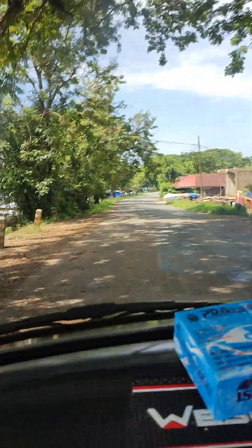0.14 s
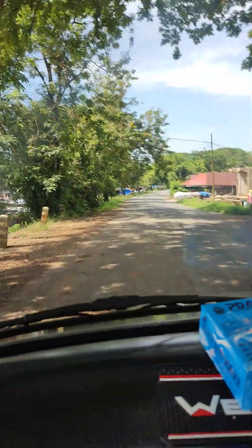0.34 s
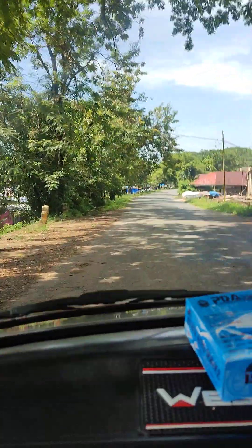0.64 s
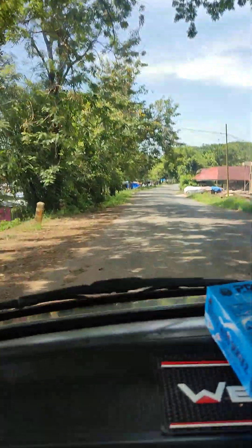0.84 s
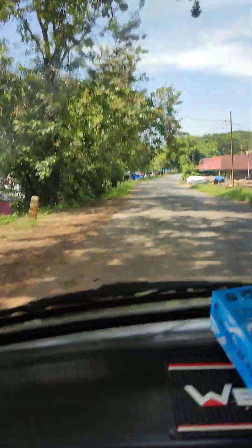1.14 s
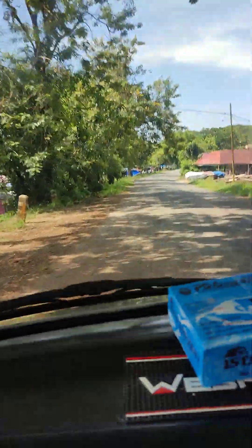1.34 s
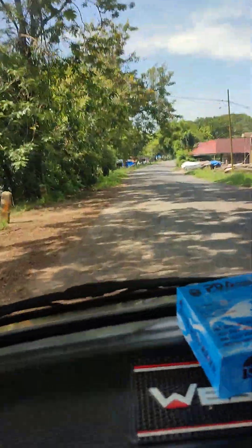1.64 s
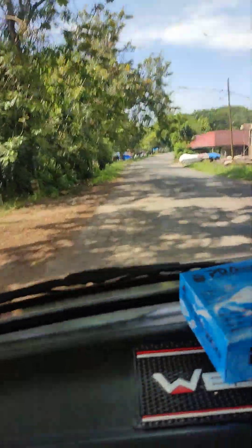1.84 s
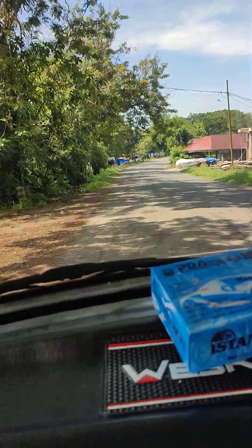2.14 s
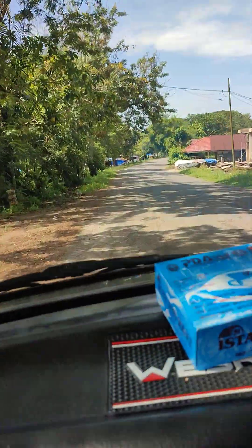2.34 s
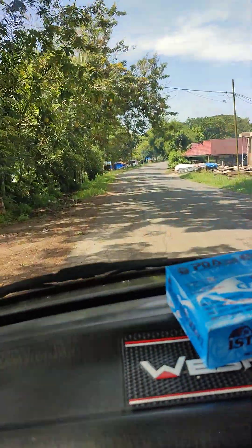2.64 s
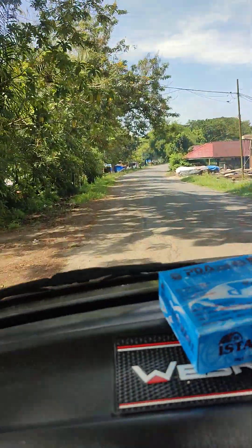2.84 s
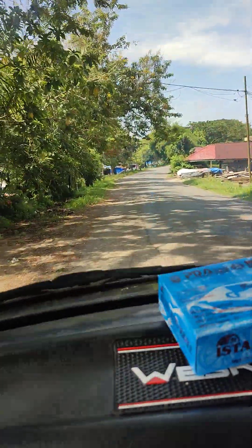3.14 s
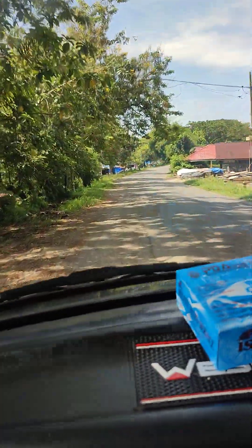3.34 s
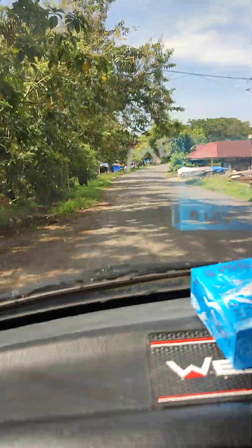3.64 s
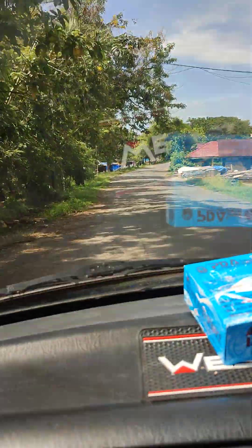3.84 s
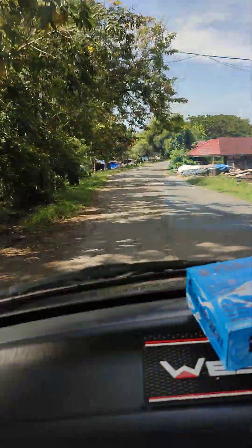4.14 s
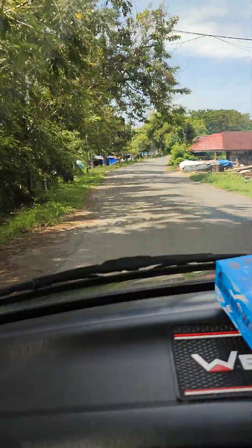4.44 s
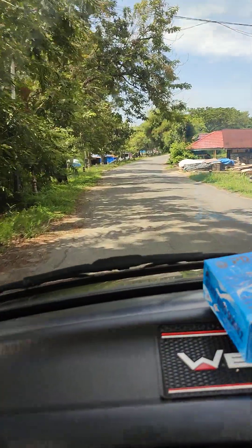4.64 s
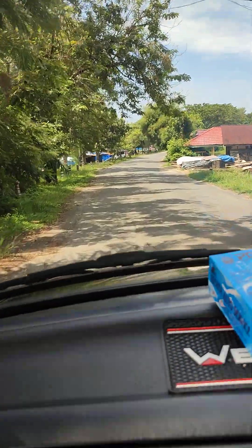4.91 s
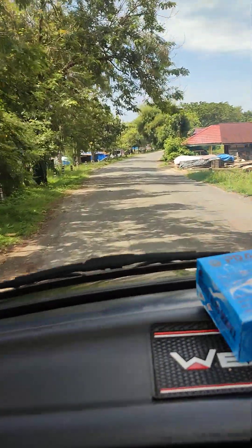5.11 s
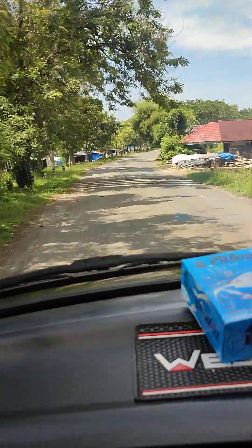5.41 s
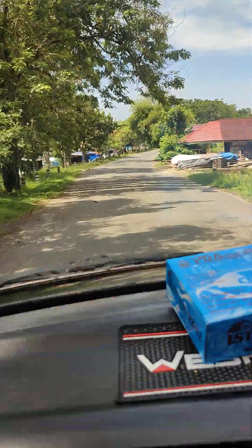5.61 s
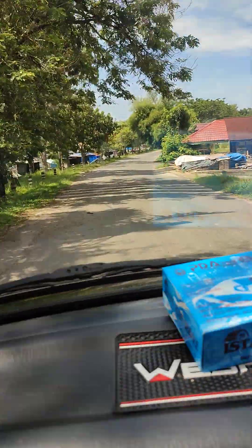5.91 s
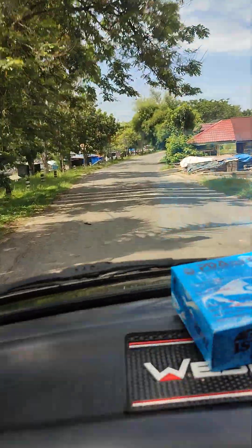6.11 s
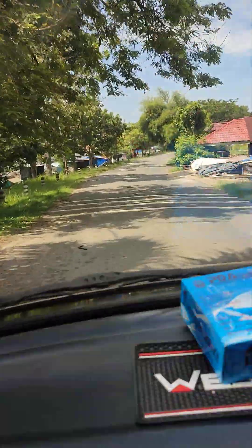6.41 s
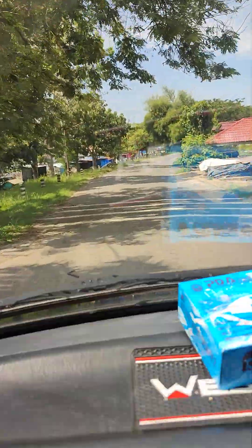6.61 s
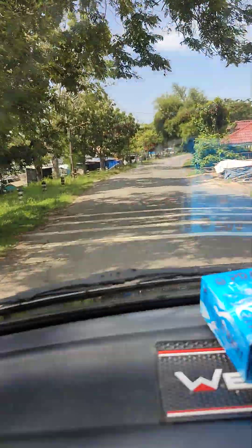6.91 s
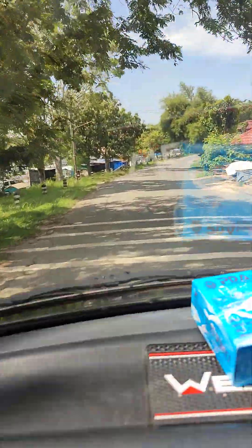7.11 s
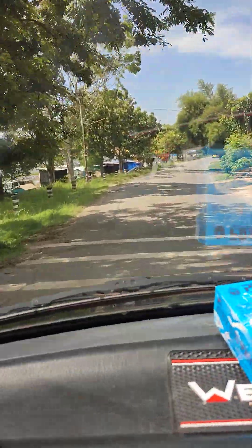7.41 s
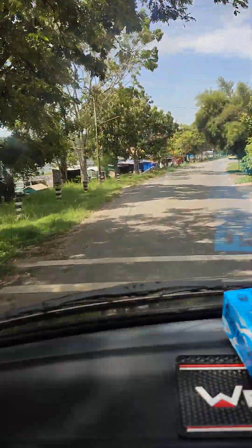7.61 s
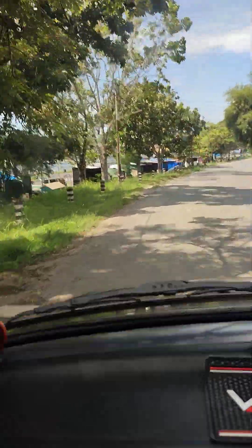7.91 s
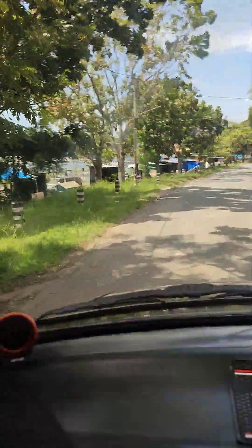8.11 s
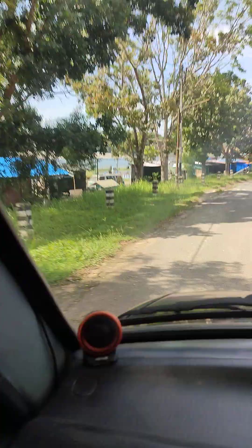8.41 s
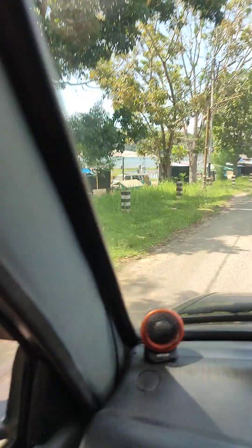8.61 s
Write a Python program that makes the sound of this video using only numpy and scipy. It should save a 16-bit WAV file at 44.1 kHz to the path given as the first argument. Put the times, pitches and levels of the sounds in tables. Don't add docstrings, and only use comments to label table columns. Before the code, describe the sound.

A car creeps along a rough road, then accelerates and holds speed, recorded in the muffled cabin. Deep body shake and engine drone dominate; soft airy hiss of grit lies above. One clear knock and a thump with clatter come early. Tiny high squeaks repeat with each wheel turn, closer together as speed rises. Two heavy low thuds and loose rattling close it.

```python
import sys
import numpy as np
from scipy import signal
from scipy.fft import rfft, irfft, next_fast_len
from scipy.io import wavfile
from scipy.ndimage import uniform_filter1d

SR = 44100
rng = np.random.default_rng(int(sys.argv[2]) if len(sys.argv) > 2 else 0)


def ratio_of_db(decibels):
    return 10 ** (np.asarray(decibels, float) / 20)


def generate_wav(signal):
    frames = np.transpose(np.atleast_2d(signal))
    scaled = np.clip(frames, -1, 1) * 32767
    pcm = np.round(scaled).astype(np.int16)
    wavfile.write(sys.argv[1], SR, pcm)


N = 385862

# [t/s, f/Hz]
FIRING = [(0, 26.3), (1.3, 26.8), (2.2, 27.4), (2.4, 28.7), (2.7, 31.6), (3, 33.7), (3.5, 37.1), (3.85, 40),
          (4.2, 42.5), (4.55, 45), (4.9, 47.7), (5.25, 49.2), (5.6, 50), (6, 50.8), (6.7, 51.3),
          (7.7, 51.3), (8.75, 50.8)]
# [t/s, lumps level/dB, loose grit level/dB]
SURFACE = [(0, -1.5, -1.5), (.5, -2, 2), (.85, 0.5, -0.5), (.95, 0, 3.5), (1.4, -0.5, 3), (1.68, 5.5, 3.5),
           (1.85, -1, 1.5), (2.1, 2, -3.5), (2.7, 1.5, -3.5), (3.3, 3, -3), (4.1, 3, -2), (5.2, 0.5, 0),
           (6.1, 0.5, -1.1), (6.7, -1.5, 0.5), (7.7, -1, 0.5), (7.95, -1, 0.5), (8.44, 4.5, 2.5),
           (8.75, 8.5, -0.5)]
# [t/s, level/dB]
RIDE = [(0, -1), (.45, -2.5), (.95, 2.5), (1.24, -6), (1.45, 5.5), (1.73, 10.5), (1.88, -12), (2.26, 4.5),
        (2.6, -5.5), (3.4, 4), (4.5, -2), (4.8, 2.5), (5.36, -2.5), (5.63, 1.5), (6.25, -2.5), (6.4, 5),
        (7.53, -4), (8.55, 11.5)]
# [t/s, extra hiss level/dB, length/s]
JOLTS = [
    (0.622, 4, 0.055),
    (1.58, 3, .04),
    (1.674, 3, 0.022),
    (5.485, 1, .02),
    (8.458, 2, 0.064),
    (8.65, 5.5, 0.052),
]

# [t/s, firing order level/dB, second order level/dB]
ENGINE = [(0, -38.5, -33.5), (.9, -36.5, -34.5), (1.5, -39, -31), (2, -27.5, -59), (2.5, -44, -45),
          (2.9, -22, -34), (3.2, -31, -31.5), (3.6, -19.5, -28), (4.05, -26.5, -29.5), (4.17, -21.5, -44),
          (4.3, -24, -28), (4.53, -21.5, -27), (4.63, -29, -39), (4.8, -28, -36), (5.2, -26, -40),
          (5.43, -36, -57), (5.7, -19.5, -56), (6.3, -25, -62), (6.7, -24, -64), (7.75, -26.5, -71),
          (7.91, -20.5, -50), (8.04, -25, -57), (8.2, -17.5, -59), (8.36, -22, -50), (8.45, -28, -49),
          (8.55, -20.5, -47), (8.75, -30, -46)]
# [multiple, level/dB]
UPPER_ORDERS = [(3, 0), (4, -1), (5, -3), (6, -4)]
# [t/s, level/dB]
THROTTLE = [(0, -58), (2.4, -55), (2.7, -43), (3.5, -48), (4.1, -43), (4.6, -52), (5.2, -54), (6.6, -53),
            (8.75, -57)]
# [f/Hz, level/dB]
CABIN = [(70, -6), (105, 4), (128, 7), (160, -5), (205, 2), (235, -7), (320, -12)]

# [f/Hz, level per Hz/dB]
HEAVE = [(3, -29), (7, -19), (11, -14), (15, 7.5), (20, -7.5), (24, -0.5), (32, -25)]
SHAKE = [(18, -15), (25, 4.5), (33, -4), (41, -7), (50, 3.5), (62, -28.5)]
BOOM = [(40, -36), (54, 8), (64, 0), (76, -5.5), (95, -6), (130, -41)]
# [f/Hz, level per Hz/dB]
ROAR = [(70, -35), (100, -4.5), (115, -4.5), (135, 1.5), (165, -6.5), (205, -5.5), (240, -11.5),
        (300, -11.5), (370, -19), (480, -21), (700, -28.5)]
RUSH = [(300, -7), (450, -0.5), (600, -8.5), (800, -4.5), (1100, -6.5), (1350, -9.5), (2100, -11.5),
        (2500, -27), (3300, -21)]
HISS = [(2000, -0.5), (2700, 0), (3500, -1.5), (4500, -3), (5500, -5.5), (6500, -4.5), (7400, -4.5),
        (8000, -10), (8900, -16), (9500, -20.5)]
FIZZ = [(8000, -19), (9300, -1.5), (11000, 0), (13000, 2.5), (14400, 0)]

# [f/Hz, correlation]
PORT_SAME = [(60, 1), (130, 1), (250, 0.93), (500, 0.5), (1000, 0.5), (2000, 0.27), (4000, 0.16),
             (14000, 0.15)]
# [f/Hz, level/dB]
PORT_TILT = [(30, 1), (100, .6), (600, 1), (1500, -1), (3500, -0.5), (5500, -2.5), (7000, -4.5), (7700, -4),
             (8500, 13), (9200, 8), (10000, -9), (11500, -3), (14000, 0.5)]
# [f/Hz, phase/rad]
PORT_TURN = [(20, .03), (60, 0.08), (250, 0.22), (520, 0.83), (1120, 1.75), (1720, 1.93), (2330, 4.2),
             (4650, 4.37)]

# [t/s, level/dB, overtone level/dB]
SQUEAKS = [(.2114, -52, -64), (.5985, -61, -66), (1.0031, -56, -65), (1.3867, -56, -64), (1.7574, -56, -68),
           (2.1184, -61, -70), (2.4768, -58, -63), (2.8165, -55, -70), (3.1293, -58, -66),
           (3.4224, -57, -69), (3.7024, -55, -69), (3.9654, -55, -65), (4.2104, -57, -66),
           (4.6794, -58, -66), (4.9094, -56, -66), (5.1264, -62, -75), (5.3424, -57.5, -70),
           (5.7684, -60, -70), (5.9674, -63, -72), (6.1824, -55, -68), (6.3864, -65, -72),
           (6.5984, -57, -75), (6.8034, -57, -66), (7.2144, -54, -72), (7.4234, -58, -70),
           (7.6244, -61, -78), (7.8404, -54, -69), (8.2614, -63, -69), (8.4454, -58, -69),
           (8.6423, -58, -69)]
# [t/s, level/dB, 500-1500 Hz share level/dB, rise/s, t60/s]
RATTLES = [(.605, -51, -2, .005, 0.085), (.897, -43, -3, 0.0018, .06), (1.319, -53, -30, .002, 0.065),
           (1.455, -46, 0, .003, .06), (1.61, -47, -14, .004, 0.092), (1.6435, -33.5, -6, 0.0004, 0.03),
           (1.651, -41, -8, .001, .05), (1.69, -58, -14, .004, 0.068), (8.42, -42, 7, .003, 0.055),
           (3.0, -44, 4, .003, 0.092), (3.22, -52, -19, .004, .08), (5.481, -56, -21, .004, 0.092),
           (7.993, -39, 6, .003, 0.06), (8.272, -43.5, -4, .004, .1), (8.446, -36, -3, 0.0074, 0.15),
           (8.498, -41, -3, .002, .06), (8.63, -36, 0, 0.016, 0.15)]
# [t/s, level/dB, t60/s]
KNOCK = [
    (.909, -38, .05),
    (.9225, -24.5, .07),
    (.938, -28, .12),
]
# [f/Hz, level/dB]
KNOCK_MODES = [(339, -4), (409, -6.5), (533, -9.5), (608, -12), (694, -16), (800, -12), (894, -23)]
# [f/Hz, level/dB, t60/s]
PING = [
    (8248, -53, .4),
]
# [t/s, level/dB, f/Hz, t60/s]
THUDS = [(0.312, -33, 82, 0.17), (.31, -28, 206, 0.13), (.32, -40, 420, 0.087), (.385, -17.5, 34, .15),
         (1.072, -41, 150, 0.046), (1.601, -16, 69, 0.13), (1.613, -16, 100, 0.084),
         (1.618, -35, 210, 0.17), (1.626, -22, 146, 0.091), (1.673, -32, 122.3, 1), (1.676, -27, 180, 0.43),
         (1.709, -34, 203, 0.75), (1.701, -23, 72.5, 0.3), (7.871, -28, 72, .4), (8.324, -8.5, 27.5, 0.41),
         (8.439, -25, 123.3, 0.51), (8.518, -9, 27.7, 0.23), (8.602, -26, 60.3, 0.24)]
# [t/s, peak level/dB, f/Hz, t60/s]
TICKS = [(.600, -52, 4300, .015), (.605, -50, 5600, .03), (.605, -57, 13700, .06), (.6085, -49, 4830, .03),
         (.613, -50, 4200, .03), (.615, -50, 5700, .03), (.619, -55, 13900, .1), (.660, -53, 3200, .015),
         (.898, -56, 4050, .04), (.898, -56, 5300, .03), (1.034, -52, 2700, .03), (1.126, -53, 5450, .025),
         (1.3185, -45, 2580, .03), (1.3185, -45, 5200, .025), (1.3185, -51, 4000, .02),
         (1.325, -42, 5260, .025), (1.325, -49, 6300, .02), (1.325, -50, 3000, .02),
         (1.332, -50, 5250, .03), (1.337, -52, 4300, .02), (1.341, -48, 2600, .025),
         (1.6437, -40, 2760, 0.032), (1.6455, -45, 4170, .03), (1.651, -47, 1930, .04),
         (1.651, -48, 6640, 0.032), (1.652, -49, 8500, 0.033), (1.655, -56, 11800, .04),
         (2.900, -58, 13900, .04), (2.954, -47, 2440, .05), (2.96, -54, 3200, .05), (3.52, -56, 3450, .15),
         (3.56, -58, 3270, .15), (4.865, -50, 3150, .06), (8.437, -40, 2600, 0.033), (8.45, -44, 1800, .03),
         (8.455, -44, 3200, .025), (8.46, -44, 2500, .03), (8.464, -47, 4200, .025), (8.5, -46, 1900, .02),
         (8.638, -46, 2200, .03), (8.645, -48, 3500, .03), (8.726, -47, 2600, .04)]
# [t/s, peak level/dB, f/Hz]
CHATTER = [(3.0062, -60, 2570), (3.2571, -58, 2650), (3.3838, -57, 2700), (3.6318, -50, 2590),
           (3.9924, -50, 2520), (4.0942, -58, 2580), (4.5661, -58, 2580), (4.7308, -53, 2660),
           (4.8839, -52, 2700), (4.9368, -55, 2610), (5.3339, -57, 2620), (5.3833, -57, 2630),
           (5.4826, -61, 2640), (5.8881, -61, 2630), (6.812, -57, 2600), (7.0435, -58, 2620),
           (7.2765, -56, 2620), (7.6955, -57, 2530)]

# [t/s,
# f/Hz, level/dB]
BIRD = [(.98, 4050, -70), (1.005, 4350, -65), (1.022, 4600, -67), (1.04, 4950, -67), (1.07, 4950, -65.5),
        (1.095, 4900, -68), (1.115, 4750, -68), (1.145, 4620, -66.5), (1.205, 4500, -69)]
INSECT = [(5.9, 11400, -88), (6.1, 11300, -71), (6.5, 11000, -69), (6.76, 10700, -77), (7.4, 10700, -78),
          (7.9, 10700, -86)]
WHINE = [(0, 1700, -65), (.15, 1705, -61), (.33, 1720, -65), (.5, 1710, -60), (.67, 1730, -60),
         (.8, 1720, -64), (1.1, 1730, -64), (1.5, 1710, -61), (1.72, 1740, -63), (1.9, 1720, -61.5),
         (2.1, 1740, -64), (2.4, 1730, -67), (2.6, 1710, -66)]
HUM = [(4.6, 580, -59), (5.5, 646, -69), (5.9, 602, -58), (6.15, 615, -49.5), (6.4, 592, -67),
       (7.5, 599, -56.5), (8.1, 595, -55.5), (8.75, 600, -57)]
SEAL = [(0, 7100, -67), (2, 7100, -70), (3.5, 7000, -82), (5, 6540, -63.5), (8.75, 6800, -66.5)]
WHIRR = [(0, 1900, -66), (1.3, 1850, -64), (2.2, 2000, -68), (3.5, 2100, -64), (5.3, 2120, -63),
         (8.75, 2100, -66)]

# (level at idle pace/dB, dB per doubling of speed, share of first control, share of second)
HEAVE_LAW, SHAKE_LAW, BOOM_LAW = (-31.5, 0.4, 1.28, -1.3), (-30, 1, 1.07, -0.35), (-34.5, 2, 0.06, 1.36)
ROAR_LAW, RUSH_LAW = (-42.5, 7, 0.7, 0.32), (-51.5, 3.5, 0.71, 0.56)
HISS_LAW, FIZZ_LAW = (-57, 1.5, 0.3, 0.91), (-77.5, 0.7, 0.45, 0.94)
IDLE_HZ = 26.5
FIZZ_BAND_DB, JOLT_FIZZ = 6.5, 0.99
PORT_LAG = 8
PAD_HZ, PAD_SPREAD_HZ, SAG_HZ_PER_S = 4350, 40, 7000
THIRD_DB, OVERTONE_SPREAD_DB = -8, 1
PING_S = 4.008
CHATTER_DB, CHATTER_T60, TAP_S = -5, .08, .0007
TICK_DB, TICK_WANDER = -1.5, 2.2
EDGE_HZ, END_FADE_S = 14270, .001


def evened(x):
    return x / np.sqrt(np.mean(x ** 2) + 1e-20)


def read(points, hz):
    f, value = np.transpose(points)
    return np.interp(np.log(hz + 1), np.log(f + 1), value)


def columns(rows):
    s, *values = np.transpose(rows)
    return [np.interp(np.arange(N) / SR, s, v) for v in values]


def during(rows):
    t = np.arange(N) / SR
    return np.clip(np.minimum(t - rows[0][0], rows[-1][0] - t) / 0.014, 0, 1)


def add(mix, s, sound):
    part = mix[:, round(s * SR):][:, :sound.shape[1]]
    part += sound[:, :part.shape[1]]


def panned(x, left_db):
    return x * ratio_of_db(np.array([[left_db / 2], [-left_db / 2]]))


def drift(rate_hz):
    t = np.arange(0, N / SR + .01, .005)
    slow = 0
    for f in np.geomspace(rate_hz / 10, rate_hz, 24):
        slow = slow + np.sin(2 * np.pi * (f * t + rng.random())) / np.sqrt(f)
    return np.interp(np.arange(N) / SR, t, evened(slow))


def resonate(x, hz, width):
    turn = np.exp(2j * np.pi * np.cumsum(hz * np.ones(x.shape[-1])) / SR)
    r = np.exp(-np.pi * width / SR)
    return 2 * (turn * signal.lfilter([1 - r], [1, -r], x / turn + 1e-18)).real


def band(rows, width):
    hz, db = columns(rows)
    a, b = round(rows[0][0] * SR), min(round(rows[-1][0] * SR), N)
    once = resonate(rng.standard_normal((2, b - a)), hz[a:b], width)
    out = np.zeros((2, N))
    out[:, a:b] = evened(resonate(once, hz[a:b], width))
    return ratio_of_db(db) * during(rows) * out


def coherent_pair(left, other, same, hz):
    return same * left * np.exp(1j * read(PORT_TURN, hz)) + np.sqrt(1 - same ** 2) * other


def rumble(spectrum):
    size = next_fast_len(N)
    hz = np.fft.rfftfreq(size, 1 / SR)[:2048]
    a, b, c, d = rng.standard_normal((len(hz), 4)).T
    same = np.clip(read(PORT_SAME, hz), -1, 1)
    tilt = ratio_of_db(read(PORT_TILT, hz) / 2)
    left = a + 1j * b
    right = coherent_pair(left, c + 1j * d, same, hz)
    shape = ratio_of_db(read(spectrum, hz)) * (hz > spectrum[0][0]) * (hz < spectrum[-1][0])
    return evened(irfft(np.array([left * tilt, right / tilt]) * shape, size)[:, :N])


def wash(spectrum, size, patchy_db, flicker_db):
    frames, hz = 4 * N // size + 5, np.fft.rfftfreq(size, 1 / SR)
    top = np.searchsorted(hz, spectrum[-1][0])
    a, b, c, d, patches = rng.standard_normal((frames, top, 5)).T
    patches = uniform_filter1d(patches, size=6, axis=0)
    patches = evened(uniform_filter1d(patches, size=8, axis=1))
    flicker = evened(uniform_filter1d(rng.standard_normal(frames), size=5))
    f = hz[:top, None]
    same = np.clip(read(PORT_SAME, f), -1, 1)
    tilt = ratio_of_db(read(PORT_TILT, f) / 2)
    left = a + 1j * b
    right = coherent_pair(left, c + 1j * d, same, f)
    shape = ratio_of_db(read(spectrum, f) + patchy_db * patches + flicker_db * flicker) * (f > spectrum[0][0])
    z = np.zeros((2, len(hz), frames), complex)
    z[:, :top] = [left * tilt * shape, right / tilt * shape]
    return evened(signal.istft(z, nperseg=size, noverlap=3 * size // 4)[1][:, :N])


def level(law, first_db, second_db):
    idle_db, speed_db, first, second = law
    doublings = np.log2(columns(FIRING)[0] / IDLE_HZ)
    return ratio_of_db(idle_db + speed_db * doublings + first * first_db + second * second_db)


def faint_tones():
    hz, db = columns(BIRD)
    bird_level = ratio_of_db(db + 2.2 + 1.8 * drift(70)) * during(BIRD)
    bird = panned(bird_level * np.sin(2 * np.pi * np.cumsum(hz + 30 * drift(90)) / SR), -3.0)
    insect = ratio_of_db(1.5 + 1.5 * drift(30)) * band(INSECT, 1300.)
    whine = ratio_of_db(1.8 * drift(12) + 1.5) * band(WHINE, 83.0)
    whirr = ratio_of_db(3.5 * drift(8)) * band(WHIRR, 610.0)
    return bird + insect + band(SEAL, 1500.) + whine + band(HUM, 38.0) + whirr


def road():
    (lumps, grit), t = columns(SURFACE), np.arange(N) / SR
    jolt_db = sum(db * np.clip(1 - abs(t - s) / length, 0, 1) for s, db, length in JOLTS)
    roar = level(ROAR_LAW, lumps, grit) * wash(ROAR, size=4096, patchy_db=-0.27, flicker_db=-1.5)
    rush = level(RUSH_LAW, lumps, grit) * wash(RUSH, size=1024, patchy_db=1.33, flicker_db=0.4)
    hiss = level(HISS_LAW, lumps, grit) * wash(HISS, size=512, patchy_db=1.0, flicker_db=0.55)
    fizz = level(FIZZ_LAW, lumps, grit) * wash(FIZZ, size=512, patchy_db=-1.0, flicker_db=0.9)
    return roar + rush + ratio_of_db(jolt_db) * hiss + ratio_of_db(JOLT_FIZZ * jolt_db + FIZZ_BAND_DB) * fizz


def body():
    (ride,), (lumps, _) = columns(RIDE), columns(SURFACE)
    heave = level(HEAVE_LAW, ride, lumps) * rumble(HEAVE)
    shake = level(SHAKE_LAW, ride, lumps) * rumble(SHAKE)
    boom = level(BOOM_LAW, ride, lumps) * rumble(BOOM)
    return heave + shake + boom


def thuds():
    out, t = np.zeros((2, N)), np.arange(SR // 2) / SR
    for s, db, hz, t60 in THUDS:
        add(out, s, panned(-ratio_of_db(db - 60 * t / t60) * np.sin(2 * np.pi * hz * t), 0.72))
    return out


def ticks():
    out, t = np.zeros((2, N)), np.arange(4000) / SR
    rows = TICKS + [(s, db + CHATTER_DB, hz, CHATTER_T60) for s, db, hz in CHATTER]
    for (s, db, hz, t60), place in zip(rows, rng.random((len(rows), 3))):
        t60 = max(t60, .008)
        walk = np.cumsum(rng.standard_normal((2, len(t))), axis=1)
        wander = TICK_WANDER * walk / np.sqrt(SR * t60 / 4)
        ring = np.sin(2 * np.pi * (hz * t + .2 * place[:2, None]) + wander) * np.clip(t / TAP_S, 0, 1)
        add(out, s, panned(ratio_of_db(db + TICK_DB - 60 * t / t60) * ring, 4 * place[2] - 3))
    return out


def knock():
    out, t = np.zeros((2, N)), np.arange(SR // 3) / SR
    for s, db, t60 in KNOCK:
        for hz, mode_db in KNOCK_MODES:
            decay = ratio_of_db(db + mode_db - 8.0 - 60 * t / t60) * np.clip(t / .0004, 0, 1)
            add(out, s, decay * np.sin(2 * np.pi * (hz * t + rng.random((2, 1)) * .15)))
    for hz, db, t60 in PING:
        decay = ratio_of_db(db - 60 * t / t60) * np.clip(t / 0.031, 0, 1)
        add(out, PING_S, panned(decay * np.sin(2 * np.pi * hz * t), 3.0))
    return out


def rattles():
    out, t, hz = np.zeros((2, N)), np.arange(8192) / SR, np.fft.rfftfreq(8192, 1 / SR)
    for s, db, thud_db, rise, t60 in RATTLES:
        colour = [(250, -63), (600, thud_db + 10.5), (1400, thud_db + 1.0), (2500, -5.5),
                  (7500, -17.0), (9500, -23.0), (14500, -29)]
        contacts = rng.standard_normal((2, len(t))) + 0.96 * rng.standard_normal(len(t))
        burst = evened(irfft(rfft(contacts) * ratio_of_db(read(colour, hz))))
        decay = ratio_of_db(db - 60 * t / max(t60, .01)) * np.clip(t / max(rise, 1e-4), 0, 1)
        add(out, s, decay * burst)
    return out


def squeaks():
    out, t = np.zeros((2, N)), np.arange(1300) / SR
    for s, db, overtone_db in SQUEAKS:
        hz = PAD_HZ + PAD_SPREAD_HZ * rng.standard_normal()
        over = ratio_of_db(overtone_db - db + OVERTONE_SPREAD_DB * rng.standard_normal())
        wander, slips = rng.standard_normal((2, len(t)))
        turns = 2 * np.pi * (hz - SAG_HZ_PER_S * (t / 2 - .012)) * t
        turns = turns + 1.6 * np.cumsum(wander) / np.sqrt(len(t))
        rub = np.clip(t / 0.0068, 0, 1) * np.clip((.024 - t) / 0.0099, 0, 1)
        slip_db = 1.5 * evened(signal.oaconvolve(slips, np.hanning(260), "same"))
        rub = rub * ratio_of_db(db - 2.0 + slip_db)
        first = panned(rub * np.sin(turns), -4.5)
        second = panned(rub * over * np.sin(2 * turns), 9.0)
        third = rub * over * ratio_of_db(THIRD_DB) * np.sin(3 * turns)
        add(out, s, first + second + third)
    return out


def engine():
    (hz,), (first_db, second_db), (upper_db,) = columns(FIRING), columns(ENGINE), columns(THROTTLE)
    turns = np.cumsum(hz * (1 + .004 * drift(6))) / SR
    turns = 2 * np.pi * (turns - np.array([[PORT_LAG], [0]]) * hz / SR)
    out = ratio_of_db(first_db + 0.54 * drift(11)) * np.sin(turns)
    out += ratio_of_db(second_db + 0.85 * drift(9.0)) * np.sin(2 * turns + 1)
    for k, db in UPPER_ORDERS:
        order_db = upper_db + db + read(CABIN, k * hz) + 2.5 * drift(6)
        out += ratio_of_db(order_db) * np.sin(k * turns + 2 * np.pi * rng.random())
    return panned(np.sqrt(2) * out, 0.6)


def scene():
    background = faint_tones() + road() + body()
    impacts = thuds() + ticks() + knock() + rattles()
    return background + impacts + squeaks() + engine()


def roll_off(x):
    return signal.sosfilt(signal.butter(12, 14570, fs=SR, output="sos"), x)


def record(dry):
    edge = signal.firwin(1023, EDGE_HZ, window=("kaiser", 9), fs=SR)
    fade = np.sin(np.pi / 2 * np.clip(np.arange(N)[::-1] / SR / END_FADE_S, 0, 1)) ** 2
    mix = signal.oaconvolve(dry * fade, edge[None], "same")
    return roll_off(mix)


dry = scene()
out = record(dry)
generate_wav(out)
```